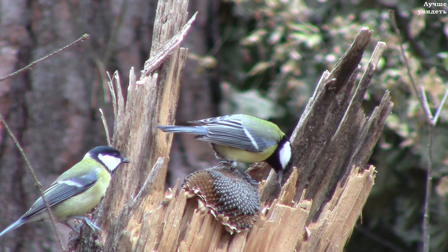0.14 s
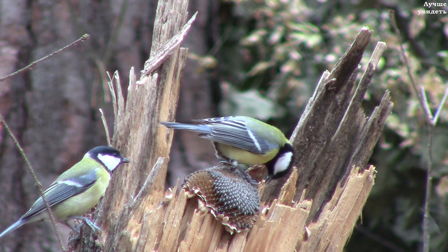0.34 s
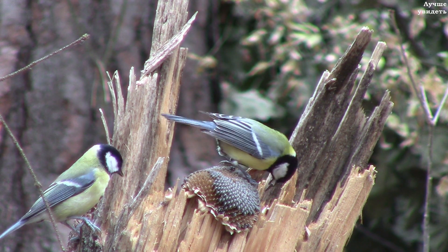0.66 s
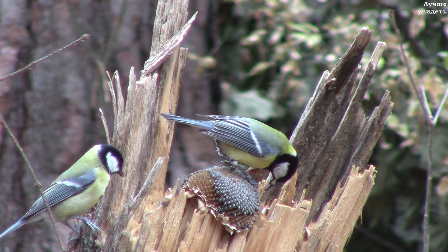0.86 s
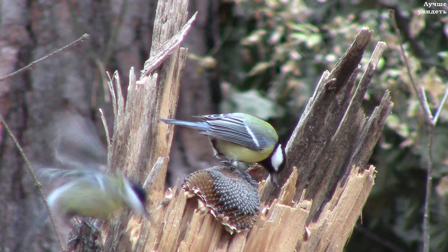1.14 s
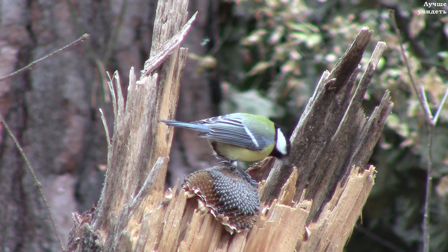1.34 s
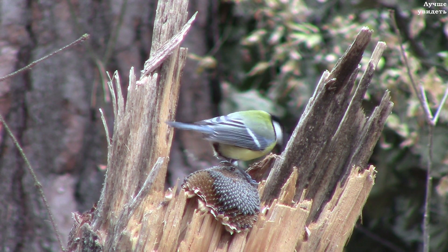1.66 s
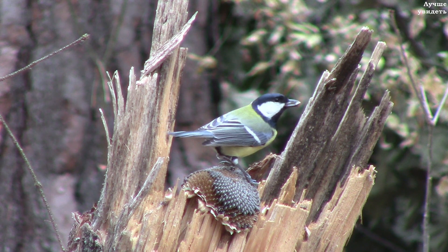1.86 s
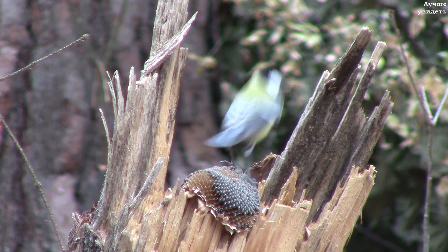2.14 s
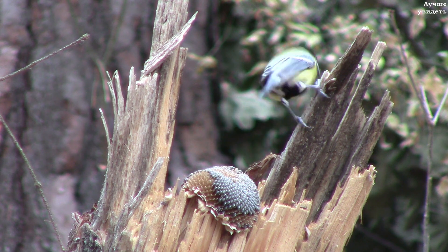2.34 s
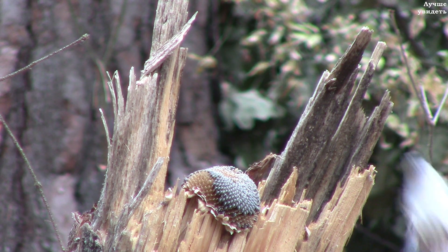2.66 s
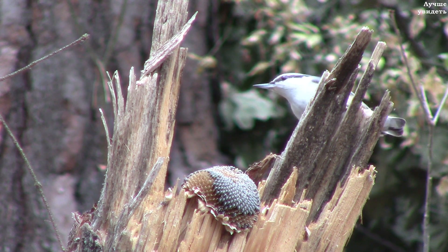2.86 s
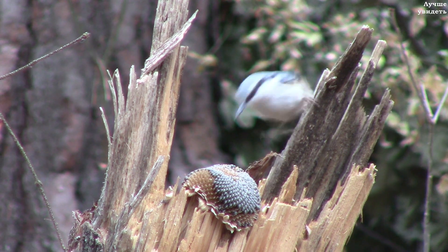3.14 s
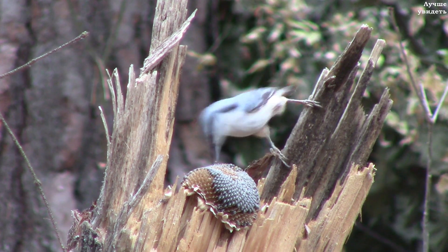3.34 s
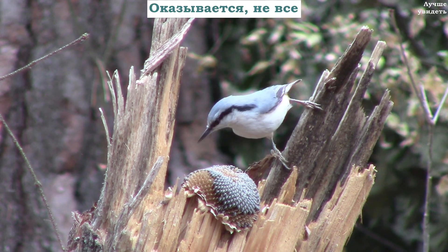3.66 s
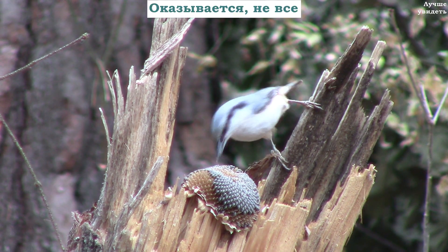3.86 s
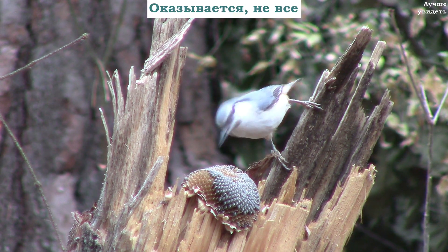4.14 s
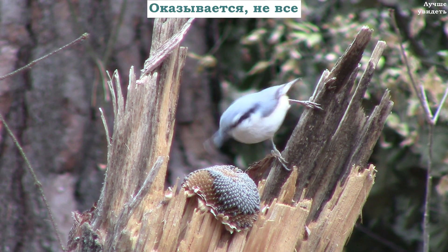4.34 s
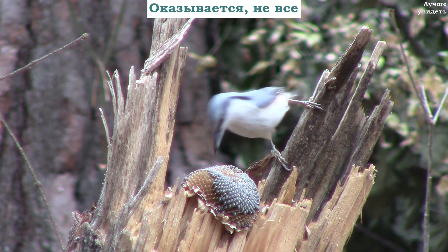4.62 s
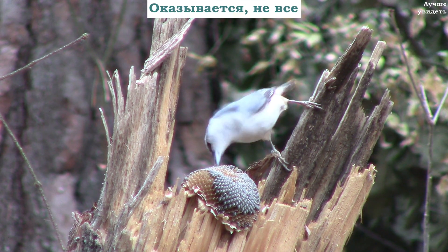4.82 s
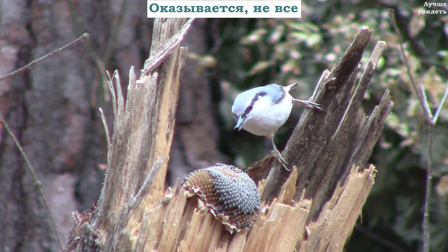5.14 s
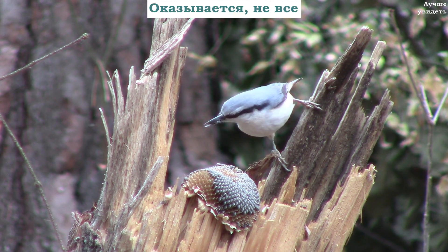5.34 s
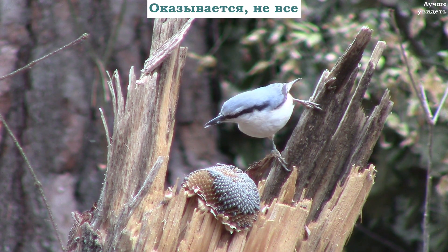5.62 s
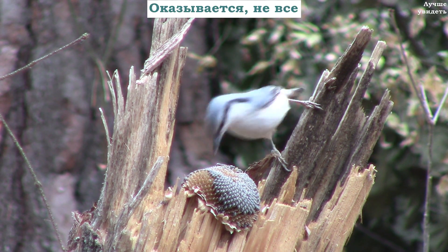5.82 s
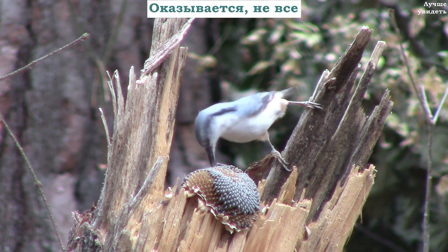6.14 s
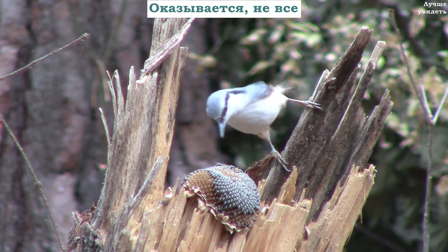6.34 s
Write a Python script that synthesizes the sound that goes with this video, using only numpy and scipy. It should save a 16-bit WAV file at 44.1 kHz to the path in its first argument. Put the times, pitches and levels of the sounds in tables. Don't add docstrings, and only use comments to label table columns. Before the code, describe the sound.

Over faint traffic rumble and leaf hiss, beaks tick and crack husks before a small bird repeats clear, arched whistled notes in rapid series.

```python
import sys
import numpy as np
from scipy import signal
from scipy.fft import rfft, irfft, next_fast_len
from scipy.io import wavfile
from scipy.ndimage import uniform_filter1d, map_coordinates

SR = 44100
rng = np.random.default_rng(int(sys.argv[2]) if len(sys.argv) > 2 else 0)


def ratio_of_db(decibels):
    return 10 ** (np.asarray(decibels, float) / 20)


def dump(signal):
    limited = np.clip(np.atleast_2d(signal).T, -1, 1)
    pcm = np.round(limited * 32767).astype(np.int16)
    wavfile.write(sys.argv[1], SR, pcm)


N = 286209
TOP_HZ = 15770

# (time [s], level [dB])
TRAFFIC = [(0, -42), (.7, -42.5), (1.7, -42.5), (2.7, -43.5), (4.3, -44), (6.49, -44)]
# (time [s], level [dB])
HISS_LEVEL = [(0, -53.5), (2.6, -53), (3.1, -50), (5.0, -52), (5.9, -51), (6.15, -54), (6.49, -54.5)]
# (frequency [Hz], density [dB/Hz])
RUMBLE = [(12, -45), (20, -19), (32, -13.5), (52, -2.5), (70, 0.5), (113, -4.5), (135, -6.5), (160, -7),
          (178, -22), (200, -11), (260, -50), (440, -120)]
# (frequency [Hz], density [dB/Hz])
DRONE = [(100, -16), (170, -4), (248, -4.5), (532, -3.5), (592, -5), (642, -5.5), (1070, -9), (2010, -18.5),
         (2810, -24.5), (4200, -32.5), (5460, -59), (9240, -120)]
# (frequency [Hz], density [dB/Hz])
LEAVES = [(1180, -72), (2000, -4), (3460, -3), (4490, -3.5), (5780, -4), (8920, -8), (11800, -13),
          (14600, -17.5), (16000, -24)]
# (frequency [Hz], correlation [0-1])
LIKENESS = [(30, 0.9), (90, 1), (180, 0.78), (350, 0.38), (700, 0.76), (1500, 0.32), (4000, 0.17),
            (12000, 0.41)]
# (time [s], length [s], start pitch [Hz], end pitch [Hz], level [dB])
WHISTLES = [
    (.13, .09, 4350, 4400, -61),
    (.32, .065, 4300, 4330, -61),
    (5.226, .026, 7850, 7300, -46),
    (2.75, .62, 236, 236, -49),
]
# (time [s], peak [dB], ring [Hz], crack [dB])
TICKS = [(0.0977, -44, 2230, -18), (0.1346, -44, 2250, -13), (0.3894, -46, 2490, -14),
         (0.624, -33, 6400, -17), (0.8544, -43, 3000, -11), (0.9754, -39, 5700, -14),
         (0.9895, -37, 5500, -8), (1.0301, -46, 2220, -12), (1.1004, -30.5, 3530, -9),
         (1.1028, -31, 4230, -6.5), (1.1277, -32.5, 4360, -9), (1.1292, -40, 3900, -6),
         (1.2785, -37, 2230, -18), (1.553, -37, 3600, -3), (1.567, -34, 4400, -8), (1.6323, -19, 2600, -10),
         (1.6354, -12, 2700, -12), (1.6395, -26, 2610, -9), (1.6526, -27, 2560, -10),
         (1.663, -31, 2600, -8), (1.6765, -30, 3000, -2.5), (1.839, -40.5, 2280, -2),
         (1.8941, -41, 2550, -13), (2.1086, -37, 3300, -12), (2.2982, -39, 2200, -18),
         (6.3525, -42.5, 2330, -6)]
# (frequency [Hz], level [dB])
HUSK = [(1200, -47), (2200, -4), (3500, 5.5), (5500, -3), (7000, -7), (9000, -13.5), (12000, -19),
        (16000, -24)]
# (time [s], peak [dB], ring [Hz])
SNAPS = [(0.387, -46, 8300), (1.4371, -54, 8690), (2.589, -38.5, 8370), (3.3697, -41, 8000),
         (4.774, -42, 7080), (4.9744, -36.5, 7200), (5.69, -50, 9030), (5.7369, -43, 8250),
         (5.7844, -42, 7610), (5.8194, -52, 8540), (5.9894, -55, 10300), (6.128, -47, 9910),
         (6.2794, -51, 7010), (6.353, -45, 8030)]
# (frequency [Hz], level [dB])
FIBRE = [(1500, -30), (3000, -10), (6000, 4), (9000, 0), (12000, -7), (16000, -7)]
# (time [s], peak [dB], pitch [Hz], t60 [s])
KNOCKS = [
    (.18, -18.5, 624, 0.026),
    (1.645, -7.5, 380, 0.022),
    (2.705, -26, 667, 0.046),
    (5.685, -22, 574, 0.024),
    (5.772, -15.5, 200, 0.028),
    (5.97, -29.5, 313, 0.091),
]
# (time [s], length [s], level [dB])
SHUFFLES = [(5.68, 0.028, -47), (5.735, 0.022, -52), (4.5, .025, -49), (5.8, 0.03, -47.5),
            (5.975, 0.039, -50), (5.7, 0.13, -55.5), (4.755, 0.051, -45), (2.7, 0.027, -54),
            (2.585, 0.095, -45), (3.9, 0.044, -40), (2.955, 0.0096, -44)]
# (frequency [Hz], level [dB])
FEATHER = [(1500, 5), (3000, 1.5), (6000, -8.5), (8000, -2), (10500, -6), (15000, -18)]
# (time [s], length [s], level [dB])
SCUFFS = [(1.25, 0.081, -64), (1.75, 0.056, -55), (1.83, 0.097, -55), (2, 0.046, -58), (2.1, 0.034, -50.5),
          (2.19, 0.091, -53), (.72, .1, -58)]
# (frequency [Hz], level [dB])
BARK = [(1200, -12), (2200, 5), (3200, 7), (4500, -9), (7000, -1), (12000, -17)]
# (frequency [Hz], level [dB])
SCATTER = [(1000, -12), (2600, -11), (3600, -1), (4200, 1), (6000, 3), (9000, 4)]
# (delay [s], level [dB], left-right [dB])
NEAR_TRUNKS = [
    (0.04, -16, 5),
    (.047, -21, 8),
    (.066, -18.5, 2),
]
# (frequency [Hz], t60 [s])
FAR_DECAY = [(1000, 3.2), (4000, 0.75), (8000, 0.68), (14000, 0.44)]
# (frequency [Hz], level [dB])
FAR_RETURN = [(1000, -16), (2000, -5), (2600, -12), (3400, -1), (3900, -2.5), (4200, 2), (6000, 1),
              (8000, 3)]
# (centre [s], top pitch [Hz], arch width [ms], level [dB], beak closure [0-1])
NOTES = [(2.6015, 2095, 12, -21, 0), (2.8096, 2100, 12.3, -23.5, 0.62), (2.982, 2088, 14, -23, 0.42),
         (3.1385, 2091, 11, -22.5, 0.44), (3.2773, 2106, 9.7, -22, 0.25), (3.4071, 2098, 11.1, -22.5, 0.38),
         (3.5374, 2077, 8.2, -21, 0.33), (3.6613, 2108, 10.7, -21.5, 0), (3.7794, 2089, 10.3, -22.5, 0.17),
         (3.891, 2090, 10.2, -22, .05), (4.0018, 2106, 9.1, -21.5, .1), (4.115, 2085, 7.7, -20.5, 0.03),
         (4.2209, 2077, 8.5, -20.5, .05), (4.329, 2081, 12.4, -23.5, 0.33), (4.4487, 2056, 11, -22.5, 0.37),
         (4.5808, 2046, 13.3, -24.5, 0.3), (4.7186, 2019, 10.6, -23.5, 0.4),
         (4.8514, 2010, 10.5, -24, 0.32), (4.9766, 1992, 8.7, -24.5, .3), (5.108, 2050, 11.1, -24, 0.34),
         (5.271, 1925, 13.8, -27, 0.4)]
# (frequency [Hz], level [dB])
BEAK = [(900, -20), (1250, -11), (2050, -21.5), (2500, -2), (3200, -9), (3800, -2.5), (4250, -2.5),
        (4900, -10), (6100, -20.5), (7000, -26.5), (7750, -20), (8400, -44.5), (11000, -54), (15000, -58)]
# (frequency [Hz], level [dB])
RASP = [(700, -22), (1300, -8), (2500, 10), (4000, -8), (6000, -2.5), (8000, -16), (11000, -17),
        (15500, -29)]

RUMBLE_DB, RUMBLE_SWING, DRONE_DB = 2.5, 1.66, 1.62
DROP_S, RETURN_S, EDGE_S = 2.72, 3.05, .012
DROP_RUMBLE_DB, DROP_DRONE_DB, DROP_LEAVES_DB = -10, -8.5, -7

PATTER_S, PATTER_GAP_S, PATTER_COUNT = .004, .0185, 8
PATTER_DB, PATTER_HZ, PATTER_T60_S = -20, 530, 0.032
TICK_PAN_DB, SNAP_PAN_DB, PAN_SCATTER_DB, SNAP_CRACK_DB = 2.5, .6, 2, 2

LEAD_SHARE, LEAD_SINKS_PER_MS = .59, .002
LEAP_MS, CREST_MS, CURVE_PER_MS2 = -8.9, .2, .0021
TAIL_SHARE, TAIL_SINKS_PER_MS, TAIL_TOP_SHARE = .93, .018, .75
LEAD_DB, SWELL_DB_PER_MS, SAG_DB_PER_MS = -5, 1.3, -0.19
HOLD_END_MS, CLOSED_HOLD_MS, RELEASE_DB_PER_MS = 8.74, 2.6, 3
LEAP_DIP_DB, LEAP_SPAN_MS, LEAP_MUTE_DB = -3, 1.5, 9
ROUGH_TOP, ROUGH_PER_SHARE, FLUTTER_DB = .1, 1.71, .7
CLOSED_LOW_DB, CLOSED_UPPER_DB, CLOSED_DIP_DB, OPEN_UPPER_DB = 4.5, -9.5, -8.5, -0.5


def unit(x):
    return x / np.sqrt(np.mean(x ** 2) + 1e-20)


def along(points, hz):
    f, v = np.transpose(points)
    return np.interp(np.log(hz + 1), np.log(f + 1), v)


def add(track, s, sound, pan_db):
    start = max(round(s * SR), 0)
    sound = sound[:N - start]
    track[:, start:start + len(sound)] += sound * ratio_of_db([[pan_db / 2], [-pan_db / 2]])


def coloured(x, response):
    m = next_fast_len(N + 4096)
    return irfft(rfft(x, m) * response(np.fft.rfftfreq(m, 1 / SR)), m)[..., :N]


def wobble(rate_hz):
    knots = rng.standard_normal(int(N * rate_hz / SR) + 4)
    return map_coordinates(knots, [np.arange(N) * rate_hz / SR])


def rush(spectrum, patchy_db):
    z = signal.stft(rng.standard_normal((2, N + 1024)), nperseg=512)[2]
    field = uniform_filter1d(rng.standard_normal(z.shape[1:]), size=6, axis=0)
    field = uniform_filter1d(field, size=10, axis=1)
    pair = signal.istft(z * ratio_of_db(patchy_db * unit(field)), nperseg=512)[1]
    m = next_fast_len(pair.shape[1])
    hz = np.fft.rfftfreq(m, 1 / SR)
    turn = np.arccos(np.clip(along(LIKENESS, hz), -1, 1)) / 2
    shaped = rfft(pair, m) * ratio_of_db(along(spectrum, hz)) * [np.cos(turn), np.sin(turn)]
    mid, side = irfft(shaped, m)[:, :N]
    return unit(np.array([mid + side, mid - side]))


def air():
    time = np.arange(N) / SR
    traffic_db = np.interp(time, *np.transpose(TRAFFIC))
    hiss_level_db = np.interp(time, *np.transpose(HISS_LEVEL))
    drop = np.clip(np.minimum(time - DROP_S, RETURN_S - time) / EDGE_S + .5, 0, 1)
    mean_db = traffic_db.mean()
    rumble_db = mean_db + RUMBLE_SWING * (traffic_db - mean_db) + RUMBLE_DB + DROP_RUMBLE_DB * drop
    rumble = ratio_of_db(rumble_db + wobble(9.1)) * rush(RUMBLE, patchy_db=0.74)
    drone_db = traffic_db + DRONE_DB + DROP_DRONE_DB * drop
    drone = ratio_of_db(drone_db + 1.2 * wobble(9.4)) * rush(DRONE, patchy_db=0.14)
    leaves_db = hiss_level_db + DROP_LEAVES_DB * drop
    leaves = ratio_of_db(leaves_db + .5 * wobble(17)) * rush(LEAVES, patchy_db=1.34)
    return (rumble + drone) * ratio_of_db([[.45], [-.45]]) + leaves


def whistles():
    out = np.zeros((2, N))
    for s, span_s, start_hz, end_hz, db in WHISTLES:
        u = np.linspace(0, 1, int(span_s * SR))
        pitch_hz = start_hz + (end_hz - start_hz) * u ** 3
        level = ratio_of_db(db + 1.6 * wobble(38.6)[:len(u)]) * np.sqrt(np.sin(np.pi * u))
        add(out, s, level * np.sin(2 * np.pi * np.cumsum(pitch_hz) / SR), pan_db=0)
    return out


def puffs(rows, spectrum):
    time = np.arange(N) / SR
    bumps = np.zeros(N)
    for s, span_s, db in rows:
        bumps += ratio_of_db(db) * np.exp(-((time - s - span_s / 2) / span_s * 2) ** 4)
    return bumps * rush(spectrum, patchy_db=2.5) * ratio_of_db(3.7 * wobble(220))


def clicks(rows, spectrum, pan_db):
    out, t = np.zeros((2, N)), np.arange(SR // 16) / SR
    colour = ratio_of_db(along(spectrum, np.fft.rfftfreq(len(t), 1 / SR)))
    rise = 1 - np.exp(-t / 0.00068)
    crack_decay = ratio_of_db(-60 * t / 0.0092) + ratio_of_db(-22 - 60 * t / 0.11)
    for s, db, hz, crack_db in rows:
        ring = ratio_of_db(-60 * t / 0.0094) * np.sin(2 * np.pi * hz * t)
        grit = unit(irfft(rfft(rng.standard_normal(len(t))) * colour, len(t)))
        crack = ratio_of_db(crack_db + 2.5) * crack_decay * grit
        pan = pan_db + PAN_SCATTER_DB * rng.standard_normal()
        add(out, s, ratio_of_db(db + 3.5) * rise * (ring + crack), pan)
    return out


def knocks():
    out, t = np.zeros((2, N)), np.arange(SR // 16) / SR
    patter = []
    for k, (a, b, c) in enumerate(rng.standard_normal((PATTER_COUNT, 3))):
        s = PATTER_S + k * PATTER_GAP_S + 0.00197 * a
        patter.append((s, PATTER_DB + 2 * b, PATTER_HZ * (1 + 0.056 * c), PATTER_T60_S))
    for s, db, hz, t60_s in KNOCKS + patter:
        rise = 1 - np.exp(-t / 0.0068)
        add(out, s, ratio_of_db(db - 60 * t / t60_s) * np.sin(2 * np.pi * hz * t) * rise, pan_db=0.5)
    return out


def stump():
    seeds = clicks(TICKS, HUSK, TICK_PAN_DB)
    snaps = clicks([(*row, SNAP_CRACK_DB) for row in SNAPS], FIBRE, SNAP_PAN_DB)
    return seeds + ratio_of_db(-4) * snaps + knocks() + puffs(SHUFFLES, FEATHER) + puffs(SCUFFS, BARK)


def forest(voice):
    out = np.zeros((2, N))
    echo = coloured(voice, lambda hz: ratio_of_db(along(SCATTER, hz)))
    for delay_s, db, pan_db in NEAR_TRUNKS:
        add(out, delay_s, ratio_of_db(db) * echo, pan_db)
    step = SR // 4
    for start in range(0, N, step):
        piece = voice[start:start + step]
        if piece.any():
            hz, t, z = signal.stft(rng.standard_normal((2, SR)), SR, nperseg=256)
            decay_db = along(FAR_RETURN, hz)[:, None] - 60 * t / along(FAR_DECAY, hz)[:, None]
            swell = 1 - np.exp(-t / 0.019)
            both, own = signal.istft(z * ratio_of_db(decay_db) * swell, SR, nperseg=256)[1]
            tail = np.array([both + 0.04 * own, both - 1.2 * own]) / np.linalg.norm(both)
            wet = signal.fftconvolve(piece[None], tail, axes=1)[:, :N - start]
            out[:, start:start + wet.shape[1]] += ratio_of_db([[-3.5], [-8]]) * wet
    return out


def twigs(voice):
    out, step = np.zeros((2, N)), SR // 9
    t = np.arange(SR // 20) / SR
    voice = coloured(voice, lambda hz: ratio_of_db(along(SCATTER, hz)))
    for start in range(0, N - step, step):
        both, own = rng.standard_normal((2, len(t))) * ratio_of_db(-60 * t / .06) * (t > .002)
        scatter = np.array([2.4 * both + 0.71 * own, 2.3 * both - 0.12 * own]) / np.linalg.norm(both)
        wet = signal.fftconvolve(voice[None, start:start + step], scatter, axes=1)[:, :N - start]
        out[:, start:start + wet.shape[1]] += ratio_of_db(-11) * wet
    return out


def pitch_share(u):
    lead = LEAD_SHARE - LEAD_SINKS_PER_MS * (u - LEAP_MS)
    parabola = 1 - CURVE_PER_MS2 * (u - CREST_MS) ** 2
    tail = np.minimum(TAIL_SHARE - TAIL_SINKS_PER_MS * u, TAIL_TOP_SHARE)
    return uniform_filter1d(np.where(u < LEAP_MS, lead, np.maximum(parabola, tail)), size=75)


def effort_db(u, closed):
    lead_db = LEAD_DB + SWELL_DB_PER_MS * (u - LEAP_MS)
    past_hold_ms = np.maximum(u - HOLD_END_MS - CLOSED_HOLD_MS * closed, 0)
    held_db = -SAG_DB_PER_MS * u - RELEASE_DB_PER_MS * past_hold_ms
    level_db = uniform_filter1d(np.where(u < LEAP_MS, lead_db, held_db), size=150)
    breaking = np.exp(-((u - LEAP_MS - LEAP_SPAN_MS / 2) / LEAP_SPAN_MS) ** 2)
    return level_db + LEAP_DIP_DB * breaking


def partial_shifts_db(u, share, closed):
    low = np.clip(8 - 10 * share, 0, 1)
    low_db = CLOSED_LOW_DB * closed
    upper_db = OPEN_UPPER_DB + CLOSED_UPPER_DB * closed
    dip_db = CLOSED_DIP_DB * closed ** 2 * np.exp(-(u / 5) ** 2)
    slide_db = -LEAP_MUTE_DB * np.exp(-((share - .8) / 0.11) ** 2)
    first = low_db + 1.8 * (1 - low) + 1.3 * slide_db
    second = 0.84 * low_db * low + dip_db
    third = upper_db * (1 - low) + slide_db * (1.2 - 0.37 * (u > 0))
    return [first, second, third] + 7 * [upper_db - 5 * low]


def nuthatch():
    voice = np.zeros(N)
    flutter, quiver, rasp = wobble(420), wobble(330), rush(RASP, patchy_db=1.5)[0]
    for s, top_hz, width_ms, db, closed in NOTES:
        stretch = (width_ms / 10) ** .6
        u = np.arange(-27, 25, 1000 / SR / stretch)
        n = len(u)
        here = slice(round(s * SR - 27 * stretch * SR / 1000), None)
        share = pitch_share(u)
        shaky = np.clip(ROUGH_TOP + ROUGH_PER_SHARE * (1 - share), 0, 1)
        pitch_hz = top_hz * share * (1 + 0.039 * shaky * quiver[here][:n])
        phase = 2 * np.pi * np.cumsum(pitch_hz) / SR
        tone = np.zeros(n)
        for k, shift_db in enumerate(partial_shifts_db(u, share, closed), 1):
            unsteady_db = 1.74 * (k != 2) * np.roll(quiver, 900 * k)[here][:n]
            partial_db = along(BEAK, k * pitch_hz) + shift_db + unsteady_db
            tone += ratio_of_db(partial_db) * np.sin(k * phase + 6 * rng.random())
        level_db = effort_db(u, closed) + (FLUTTER_DB + 2.2 * shaky) * flutter[here][:n]
        hiss = ratio_of_db(-25.0 - .5 * np.clip(level_db, -20, 0)) * rasp[here][:n]
        voice[here][:n] += ratio_of_db(db + 3.0 + level_db) * (tone + hiss)
    return voice


def scene():
    voice = nuthatch()
    left, right = ratio_of_db([[2.6], [-2.8]]) * voice + twigs(voice) + forest(voice)
    right = coloured(right, lambda hz: np.exp(-2j * np.pi * hz * 32e-6))
    return np.array([left, right]) + stump() + whistles() + air()


def top_cut(x):
    return signal.sosfilt(signal.butter(12, 15770, fs=SR, output="sos"), x)


def record(dry):
    limited = coloured(dry, lambda hz: hz < TOP_HZ)
    return top_cut(limited)


dry = scene()
out = record(dry)
dump(out)
```